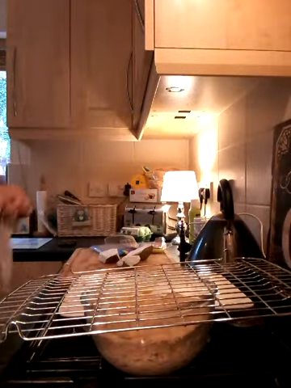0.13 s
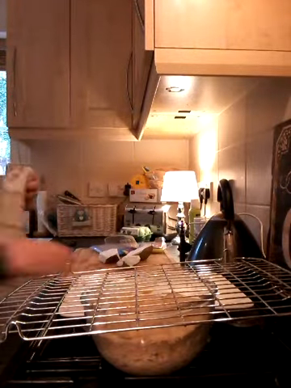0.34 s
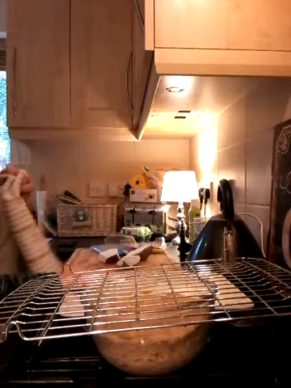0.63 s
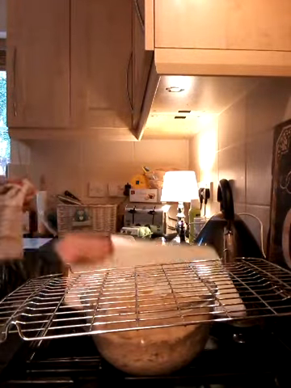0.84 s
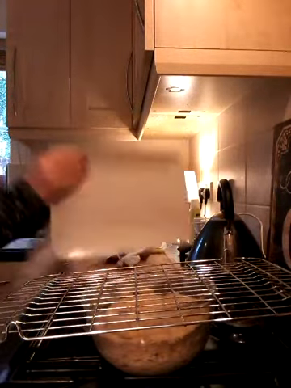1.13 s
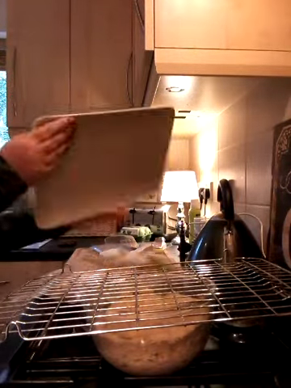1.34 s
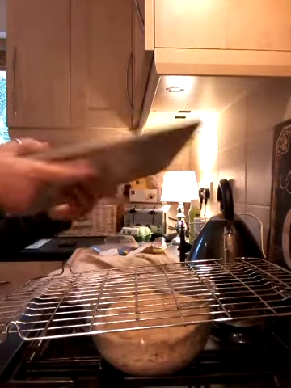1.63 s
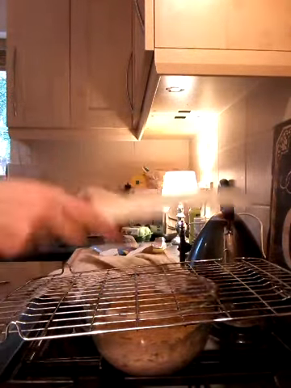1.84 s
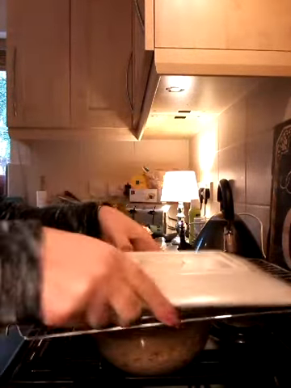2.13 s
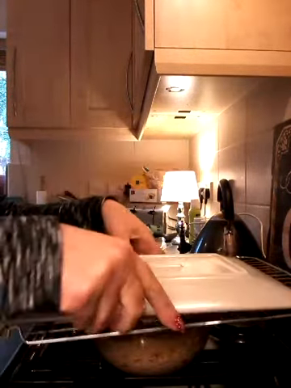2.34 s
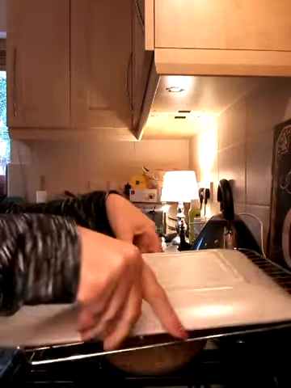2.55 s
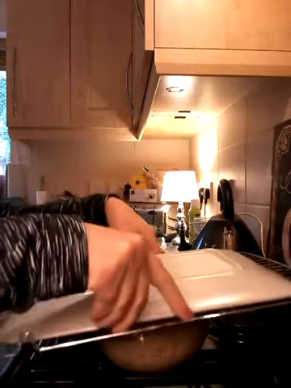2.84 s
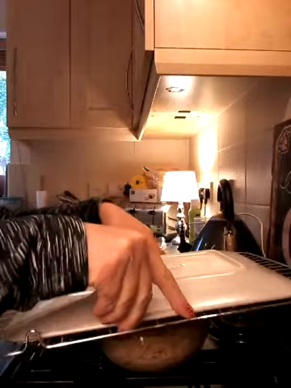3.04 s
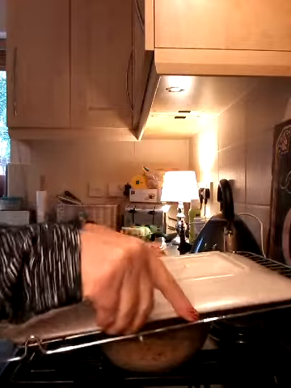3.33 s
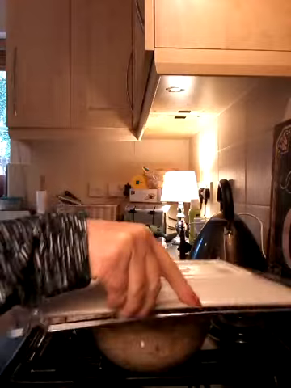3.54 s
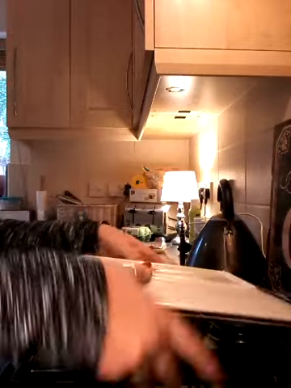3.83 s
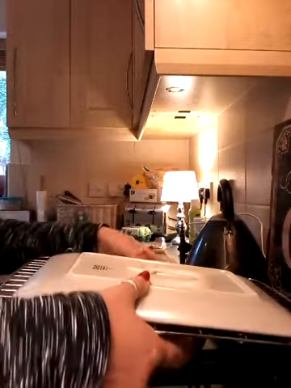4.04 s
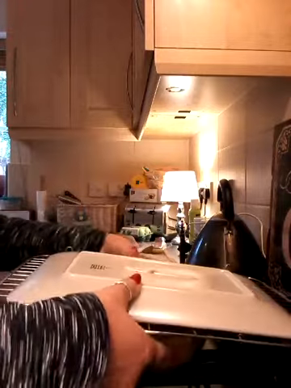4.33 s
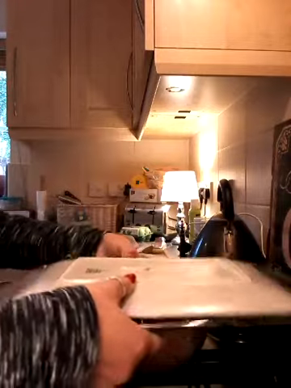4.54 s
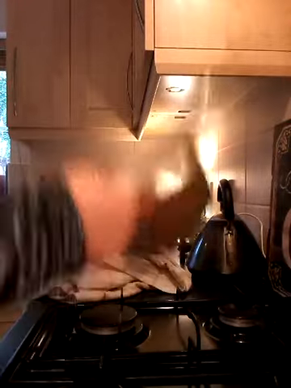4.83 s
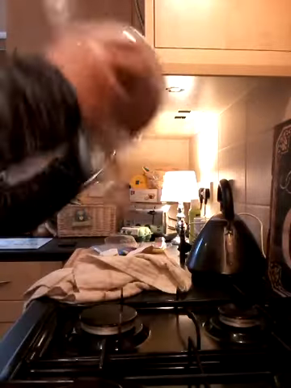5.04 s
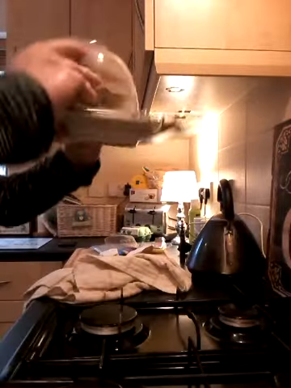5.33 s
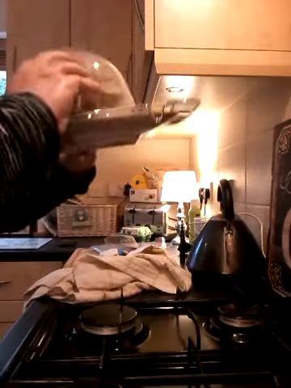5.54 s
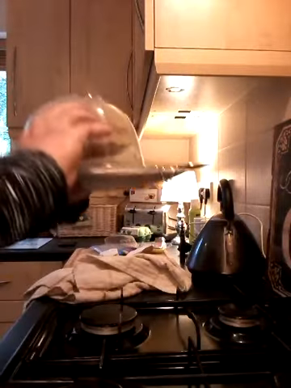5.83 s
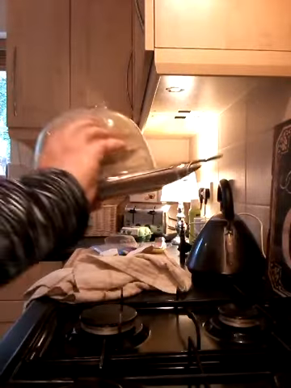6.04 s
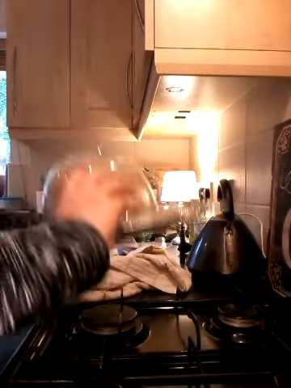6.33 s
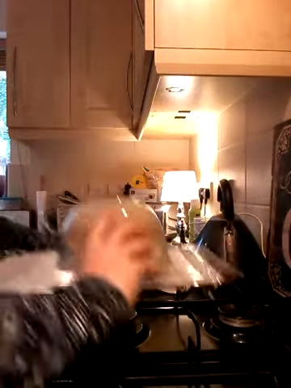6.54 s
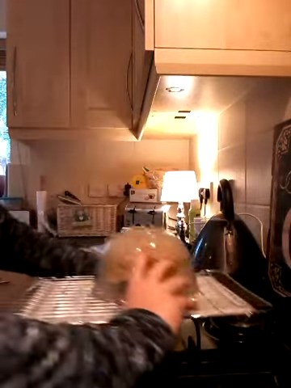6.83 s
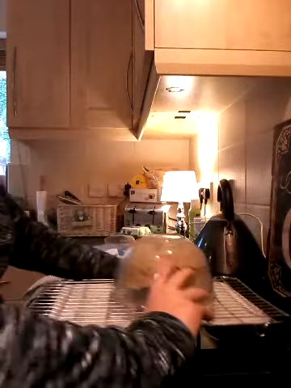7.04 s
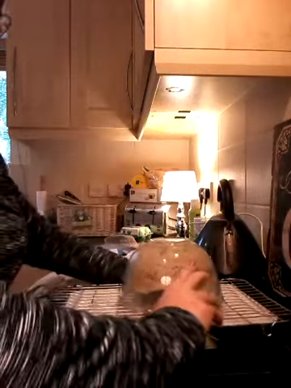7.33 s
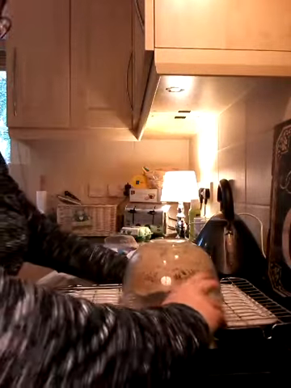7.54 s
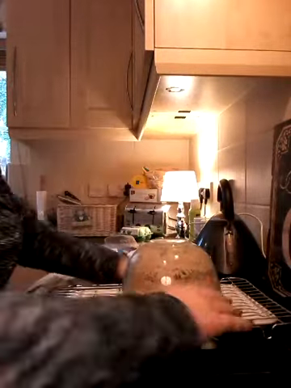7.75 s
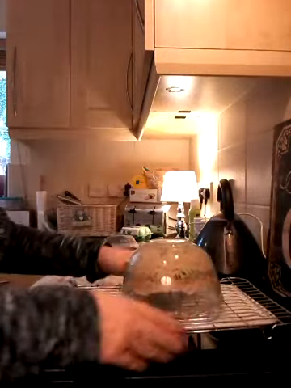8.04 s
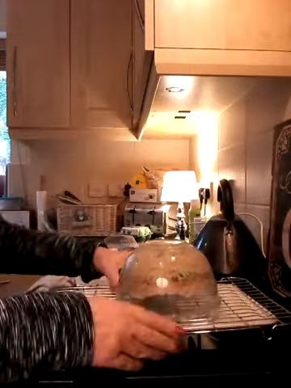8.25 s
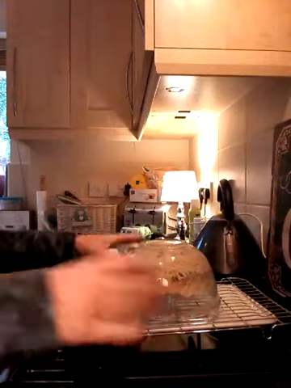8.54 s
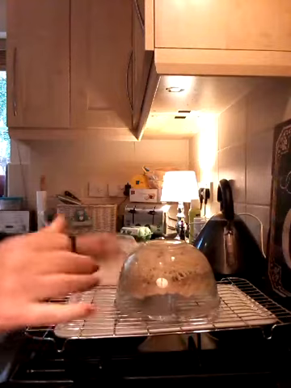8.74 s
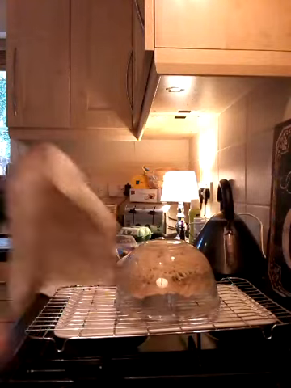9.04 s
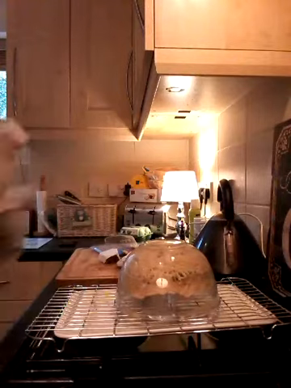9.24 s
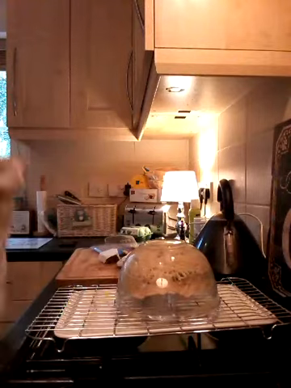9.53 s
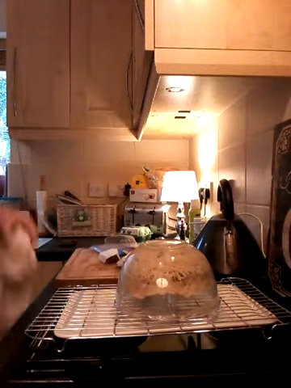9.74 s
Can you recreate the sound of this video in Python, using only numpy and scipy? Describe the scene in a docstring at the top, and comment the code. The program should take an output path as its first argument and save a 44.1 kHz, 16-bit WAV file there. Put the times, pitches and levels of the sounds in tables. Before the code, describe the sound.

Loud bright metallic scrape and clatter, rack rattles and dull bumps on a cooker top, ending with wooden knocks and small dish clinks over fridge-like hum.

```python
"""First comes a fridge-like hum with faint sliding, then metal clatters in a quiet kitchen.
A tray is pulled from under a wire rack, laid on it, turned over with a glass bowl and set down on the hob;
then something wooden and some dishes knock on the worktop. Each blow is a tick and a rattle of noise that
rings a set of modes; sliding is uneven noise that rings the wires and the board; one glassy note is a
sine that rings on until it is touched. The hum is a steady low sine, room hiss and fuzzy tones."""
import sys
import numpy as np
from scipy import signal
from scipy.fft import rfft, irfft, next_fast_len
from scipy.io import wavfile
from scipy.ndimage import uniform_filter1d

SR = 44100
rng = np.random.default_rng(int(sys.argv[2]) if len(sys.argv) > 2 else 0)


def dump_mix(stems):
    """Bounce the given channels to the path in sys.argv[1] as a 16-bit WAV at rate SR."""
    frames = np.atleast_2d(stems).T  # one column per channel
    limited = np.clip(frames, -1, 1)  # hard clip at full scale
    pcm = np.round(limited * 32767).astype(np.int16)
    wavfile.write(sys.argv[1], SR, pcm)


N = 436590  # length of the scene in samples


def pulled_tray():
    """Blows of every hardness ring the tray as it is pulled from under the rack."""
    # blows: start_s, level_db (3.5-8.5 kHz, before a fixed cut), low_db and mid_db (bands against that),
    # rattle_s (time to fall 60 dB), rise_s
    pull_blows = [(0.664, -45, 5, -1.5, .36, .016), (0.7302, -29, 12, 6, .21, 0.00037),
                  (0.7594, -22, -3, -5, .2, 0.017), (0.7914, -5.5, -6.5, -5, .13, 0.0041),
                  (0.8344, -9.5, -17, -10.5, .17, 0.011), (0.8844, -6, -27.5, -8.5, .11, 0.0047),
                  (0.9573, -2.5, -17.5, -11.5, .094, 0.00057), (0.9995, -11.5, -11.5, -6.5, .082, 0.0052),
                  (1.0394, -19.5, -29, -20, .22, .01)]
    # ringing modes: pitch_hz, width_hz, level_db (relative)
    pull_modes = [(357, 28, -3.5), (676, 220, -6), (1586, 41, -9.5), (1860, 28, -12), (2097, 31, -4),
                  (2455, 68, -4.5), (2590, 110, -9), (2810, 87, -10), (3430, 74, -10.5), (3746, 46, 1.5),
                  (4330, 30, -3.5), (4630, 49, -8), (5140, 40, -9.5), (6030, 110, -8.5), (6270, 12, -2),
                  (6456, 55, -2), (6910, 44, 4), (7240, 16, 4), (8350, 68, -3.5), (8660, 45, -1.5),
                  (9270, 39, -9.5), (10100, 130, -2.5), (11200, 39, -14), (11550, 100, -21),
                  (13300, 29, -19.5)]
    return blows(pull_blows, pull_modes, top_db=-23, top_slope=0.44, ring_db=1.55, spot_db=1.7)


def tray_knocks():
    """Knocks that all land alike ring the tray's own modes."""
    # blows: start_s, level_db (3.5-8.5 kHz, before a fixed cut), low_db and mid_db (bands against that)
    knocks = [(1.5454, 0.5, -29.5, -13.5), (1.5744, -15, -17, -4), (1.5964, -7.5, -45, -56),
              (1.8472, -19.5, -39, -18), (1.8744, -26, -18, -15), (1.8982, -27, -34, -21),
              (1.9834, -43, -5, -15), (2.1296, -45, -28, -34)]
    # ringing modes: pitch_hz, width_hz, level_db (relative)
    tray_modes = [(943, 60, -0.5), (1638, 35, -3), (2068, 47, -6), (2415, 29, -13.5), (2466, 28, -6),
                  (3360, 39, -26.5), (3850, 70, -12.5), (4160, 44, -19.5), (4657, 260, -16.5),
                  (5400, 330, -17), (5720, 120, -9), (6240, 29, -18), (7030, 93, -8.5), (6700, 9.6, -17.5),
                  (6940, 35, -16.5), (7500, 41.1, -14), (7880, 49.8, -10), (8320, 24, -14), (8040, 20, -5),
                  (9820, 49, -9.5), (10490, 14, -15.5), (11600, 330, -20.5), (14400, 26.7, -16.5),
                  (14300, 110, -38.5)]
    landed = alike(knocks, rattle_s=0.041, rise_s=0.00044)
    return blows(landed, tray_modes, top_db=-17.5, top_slope=0.25, ring_db=8.5, spot_db=5)


def rack_blows():
    """Blows of every hardness ring the modes of the wire rack."""
    # blows: start_s, level_db (3.5-8.5 kHz, before a fixed cut), low_db and mid_db (bands against that),
    # rattle_s (time to fall 60 dB), rise_s
    rack_hits = [(2.2077, -8, -20.5, -24, 0.13, 0.0015), (2.2494, -19, -6.5, -13.5, 0.099, 0.0047),
                 (2.2997, -13, -40, -16, 0.18, 0.00051), (2.3287, -24.5, -9, -12, 0.33, 0.00064),
                 (2.5205, -50.5, 10, -30, .06, 0.00058), (2.5651, -59, 15, -24, 0.048, 0.00043),
                 (2.6467, -18.5, -15, -11.5, 0.12, 0.002), (2.805, -42.5, -23, -4, 0.049, 0.0094),
                 (2.994, -39.5, -7, -11, 0.1, 0.0081), (3.158, -31.5, -32, -7, 0.078, .012),
                 (3.1792, -6, -13.5, -17, 0.13, 0.00047), (3.2098, -17, -6.5, -12, 0.36, 0.0046),
                 (3.43, -23.5, -11, -12, 0.15, 0.039), (3.6018, -45.5, 5.5, -2, 0.071, .0065),
                 (3.6207, -28, -12, -16, .044, .0006), (3.93, -40.5, -5, -4, 0.12, 0.0073),
                 (3.9699, -40, -24, -29, 0.055, 0.00061), (4.089, -59.5, 22.5, 0, 0.034, 0.005),
                 (4.25, -40, 5, -10, 0.16, 0.017), (4.3151, -30.5, -15, -9.5, 0.2, 0.0012),
                 (4.3389, -34.5, 6.5, -11, 0.054, 0.0042), (4.5114, -50.5, 21, -1, .054, .0006),
                 (4.554, -53, -10, -10, 0.045, .002), (5.0779, -48, -32, -14, 0.0075, .0002),
                 (5.2879, -35.5, -30, -22, 0.15, .0008), (5.7453, -49, -7, -2, 0.059, .0004),
                 (5.8217, -39.5, -26, -10.5, 0.15, .014), (5.8531, -35.5, -15, -10, 0.072, .009),
                 (5.9494, -18.5, -21, -16.5, 0.033, 0.00031), (6.108, -21.5, -18.5, -16.5, 0.067, 0.0009),
                 (6.2018, -26, -17, -18, 0.032, 0.00055), (6.4213, -51.5, -27, -16, 0.061, .004),
                 (7.0601, -45, -12, -9.5, 0.046, .007), (7.131, -28, 11.5, 0.5, 0.057, 0.0035),
                 (7.1515, -17, 0.5, -10, 0.069, 0.0034), (7.239, -3.5, -17.5, -9, 0.061, 0.00061),
                 (7.2781, -13.5, -2.5, -5, 0.037, 0.0056), (7.4714, -34.5, -44, -10, .073, .0012),
                 (8.0734, -49, -38, -1, 0.11, .008), (8.16, -33, -26, -17, 0.27, 0.015),
                 (8.336, -32, 4, 10, 0.019, 0.0011), (8.4218, -35, -7, -6.5, 0.12, 0.00066),
                 (8.5195, -42, -5, -2, 0.067, 0.00071)]
    # ringing modes: pitch_hz, width_hz, level_db (relative)
    rack_modes = [(334, 200, -1), (588, 7.7, 8), (970, 17, -13), (1300, 16, -3), (1620, 54, 9.5),
                  (2172, 48, -7), (2442, 420, -2.5), (3374, 33, 6), (3787, 99, 0.5), (4320, 13, -19),
                  (4166, 71, -0.5), (4820, 83, 3.5), (5070, 98, -3.5), (6240, 51, -31), (6240, 11, -19),
                  (6380, 8.3, -33), (6940, 15.7, -9), (6697, 114, 3.5), (6820, 89, 4.5), (7310, 480, 8),
                  (7130, 41, -22.5), (8186, 44, 8.5), (8000, 18, -9), (7990, 8.6, 14.5), (9600, 110, -19),
                  (8480, 42, -28), (10100, 26, -40), (9400, 26, -33), (10540, 130, -2.5), (11740, 55, 1)]
    return blows(rack_hits, rack_modes, top_db=-24.5, top_slope=-0.29, ring_db=-1.5, spot_db=3)


def worktop_knocks():
    """Something wooden knocks on the worktop and rings its modes."""
    # blows: start_s, level_db (3.5-8.5 kHz, before a fixed cut), low_db and mid_db (bands against that)
    knocks = [(9.3834, -32.5, 5.4, -1), (9.4055, -28.5, 10, 9), (9.424, -37, 11, -2),
              (9.4678, -45, 26.5, 11), (9.49, -52, 18, 25), (9.5145, -40.5, 13, 14),
              (9.6073, -29, 13.2, -7)]
    # ringing modes: pitch_hz, width_hz, level_db (relative)
    worktop_modes = [(515, 69, 4.5), (984, 156, 4), (1544, 12, -3), (1730, 44, -6.5), (2000, 110, -41),
                     (2610, 35, -4), (3100, 44, -21), (6630, 67, -2), (7350, 71, -9), (8200, 160, -8),
                     (8380, 25, -9), (10900, 46, -12)]
    landed = alike(knocks, rattle_s=0.055, rise_s=0.0021)
    return blows(landed, worktop_modes, top_db=-12.5, top_slope=0.16, ring_db=7.5, spot_db=2.7)


def dish_clinks():
    """Short, hard contacts ring the modes of the dishes."""
    # blows: start_s, level_db (3.5-8.5 kHz, before a fixed cut), low_db and mid_db (bands against that)
    clinks = [(9.5023, -27, -21, -15), (9.616, -9, -11, -20), (9.6294, -19.5, -21, 4.5),
              (9.654, -13.5, -7.5, -22), (9.6939, -8, -17.5, -3.5), (9.6974, -8.5, -14, -22),
              (9.7064, -28, -15, -13), (9.7314, -30, -17, -20)]
    # ringing modes: pitch_hz, width_hz, level_db (relative)
    dish_modes = [(259, 20, -6), (465, 64, -5), (785, 83, -5.5), (1820, 28, -11), (2180, 130, -28),
                  (2530, 28, -9), (2840, 180, -13.5), (3545, 22, -8.5), (4110, 11, -16), (5380, 34, -12),
                  (5740, 31, -45), (6300, 130, -18), (6860, 62, 2.5), (6440, 26, -23), (7660, 52, -9),
                  (7870, 62, -12), (8140, 30, -13), (9960, 13, -11.5), (10800, 54, -36), (13300, 35, -34)]
    landed = alike(clinks, rattle_s=0.008, rise_s=0.0003)
    return blows(landed, dish_modes, top_db=-51, top_slope=-1.85, ring_db=4, spot_db=1.1)


def sliding():
    """Uneven slipping noise rings the wires and the board and adds a hiss."""
    # sliding and handling, one list a passage, each row: time_s, level_db (before the mix below)
    passages = [
        [(0.08, -79), (0.2, -70.5), (0.4, -78)],
        [(0.66, -64.5), (0.78, -36), (0.91, -34), (0.99, -22.5), (1.11, -52), (1.4, -58.5), (1.73, -54.5),
         (2.0, -62), (2.2, -65.5)],
        [(2.2, -69), (2.38, -61), (2.59, -54.5), (3.15, -65.5), (3.24, -45), (3.42, -49.5), (3.58, -57.5),
         (3.84, -59), (4.06, -67), (4.44, -60.5), (4.7, -77)],
        [(5.08, -63), (5.178, -50), (5.266, -51), (5.34, -44), (5.46, -51), (5.55, -100)],
        [(5.75, -66), (5.9, -64), (6.034, -44), (6.092, -56), (6.214, -56), (6.366, -56), (6.45, -86.5)],
        [(6.95, -70.5), (7.164, -56.5), (7.304, -33.5), (7.374, -48.5), (7.522, -59), (7.62, -65.5)],
        [(8.05, -66.5), (8.132, -56), (8.26, -45), (8.342, -55.5), (8.43, -54.5), (8.572, -63), (8.65, -71)],
        [(9.2, -71.5), (9.438, -60), (9.49, -47), (9.558, -67), (9.62, -56), (9.85, -58.5)],
    ]
    # ringing of the wires: pitch_hz, width_hz, level_db (relative)
    wire_modes = [(1560, 40, -9), (2000, 23, -10.5), (2454, 31, -18.5), (2880, 29, -11.5),
                  (3270, 140, -9.5), (3620, 370, -4.5), (4300, 48, -9), (4560, 74, -6.5), (5400, 260, -6.5),
                  (6290, 48, -13), (6000, 28, -7.5), (6560, 100, -8.5), (7750, 36, 5.5), (7960, 110, -11),
                  (9450, 76, -16.5)]
    # ringing of the board: pitch_hz, width_hz, level_db (relative)
    board_modes = [(316, 81, -5.5), (718, 55, 2.5), (1250, 57, -5.5)]
    # colour of the hiss: pitch_hz, level_db (relative)
    hiss_colour = [(590, -48.5), (1000, 1.5), (1350, -15), (1850, -1.5), (2980, -8), (3300, -6.5),
                   (4900, -8), (7350, -2), (16000, -30.5)]
    # the board against the wires: one level_db for each passage (before the mix below)
    board_share_db = [-14, -3, -1.5, -9, -10.5, -2, -3.5, -2]
    slips = rng.standard_normal((2, N)) * chatter(N, per_s=130.0, bump_db=-4.3)
    wires = evened(filtered(slips[0], peaks(wire_modes)))
    hiss = evened(filtered(slips[0], lambda hz: amp(read(hiss_colour, hz))))
    board = evened(filtered(slips[1], peaks(board_modes)))
    effort = np.array([played(rows) for rows in passages])
    on_wires = effort.sum(0) * (amp(-5.0) * wires + amp(-4) * hiss)
    on_board = amp(board_share_db) @ effort * amp(-5.5) * board
    return on_wires + on_board


def ring():
    """One thin glassy mode loses little until a hand damps it; it wavers as the tray turns."""
    # each contact sets the note anew: start_s, level_db (before the waver), loss_db_per_s
    contacts = [(0.88, -25.5, 198), (0.96, -14.5, 32), (1.55, -38, 38.5)]
    pitch_hz, stop_s, smoothing_s = 7454, 2.15, 0.0052
    waver_db, waver_per_s = 0.5, 3  # up and down by this much
    t, level = np.arange(N) / SR, np.zeros(N)
    for start_s, db, loss_db in contacts:
        level = np.where(t >= start_s, amp(db - loss_db * np.abs(t - start_s)), level)
    level = uniform_filter1d(level * (t < stop_s), round(smoothing_s * SR))
    waver = amp(waver_db * np.cos(2 * np.pi * waver_per_s * (t - contacts[1][0])))
    return level * waver * np.sqrt(2) * np.sin(2 * np.pi * pitch_hz * t)


def board_hum():
    """The board hums when squeezed: near sines that swell and fade, with a weak second harmonic."""
    # hums: start_s, length_s, level_db (mid-swell, before flutter), pitch_hz (mid-swell)
    hums = [(2.27, 0.29, -52, 284.5), (3.2, 0.15, -43.5, 282.4), (3.33, 0.1, -46.5, 281),
            (3.46, 0.24, -56, 284), (3.71, .1, -45.5, 284), (3.81, 0.15, -40, 277), (4.07, 0.082, -57, 276),
            (4.48, 0.14, -47.5, 273.4), (6.93, 0.18, -69, 293), (8.47, 0.18, -58.5, 343)]
    sag_hz, roughness, second_db = 9, 0.33, -19.0  # pitch drop at both ends, flutter share, harmonic
    out = np.zeros(N)
    for start_s, length_s, db, hz in hums:
        size = round(length_s * SR)
        arch = np.sin(np.pi * np.arange(size) / (length_s * SR))
        flutter = 1 + roughness * evened(uniform_filter1d(rng.standard_normal(size), size=500))
        phase = 2 * np.pi * np.cumsum(hz - sag_hz * (1 - arch)) / SR
        wave = np.sin(phase) + amp(second_db) * np.sin(2 * phase)
        out[round(start_s * SR):][:size] += amp(db) * arch * flutter * np.sqrt(2) * wave
    return out


def shudder():
    """Low modes of the hob and worktop after heavy blows: a rumble, and one panel that booms."""
    # shudders: start_s, level_db (before rise, fade and mix), boom_hz (pitch of the booming panel)
    shudders = [(0.6, -71.5, 61.4), (0.73, -52, 60.5), (0.811, -39, 58.3), (0.97, -38, 74),
                (2.248, -51, 97), (2.64, -56.5, 70.5), (2.98, -70, 60.4), (3.19, -51.5, 61),
                (3.42, -55, 58.4), (3.68, -54, 93), (3.86, -63, 59.3), (4.3, -56, 58.4), (5.952, -56, 97.6),
                (6.18, -64, 101.8), (7.129, -41.5, 62.3), (7.24, -45, 60.3), (8.24, -51.5, 56),
                (8.35, -64.5, 56), (8.52, -67, 57.2), (9.59, -58, 66)]
    # colour of the rumble: pitch_hz, level_db (relative)
    rumble_colour = [(15, -40.5), (25, -26.5), (40, -11), (59, -3.5), (77, 0), (107, -5), (145, -6.5),
                     (167, -12), (220, -8.5), (290, -43.5), (480, -120)]
    rise_s, rumble_t60_s, boom_t60_s = 0.04, 0.9, 1  # t60: time to fall 60 dB
    t, power, boom = np.arange(N) / SR, np.zeros(N), np.zeros(N)
    for start_s, db, boom_hz in shudders:
        since = np.maximum(t - start_s, 0)
        start = (1 - np.exp(-since / rise_s)) * amp(db)
        power += (start * amp(-60 * since / rumble_t60_s)) ** 2
        boom += start * amp(2 - 60 * since / boom_t60_s) * np.sin(2 * np.pi * boom_hz * since)
    rumble = evened(filtered(rng.standard_normal(N), lambda hz: amp(read(rumble_colour, hz))))
    return amp(-1.5) * np.sqrt(power) * rumble + boom


def kitchen(x):
    """Echoes of the room: sparse taps of random sign, each band dying at its own speed."""
    # how long echoes last: pitch_hz, t60_s (time to fall 60 dB)
    decay = [(150, 0.56), (1000, 0.25), (4000, 0.26), (12000, 0.083)]
    taps = np.zeros(SR // 2)
    at = np.arange(120, SR // 2 - 20, 20)
    taps[at + rng.integers(0, 20, len(at))] = rng.choice([-1., 1.], len(at))
    hz, t, z = signal.stft(taps, SR, nperseg=256)
    fade = amp(-60 * t / read(decay, hz)[:, None])
    tail = signal.istft(z * fade, SR, nperseg=256)[1]
    return signal.oaconvolve(x, tail / np.linalg.norm(tail))[:N]


def air():
    """The fridge-like bed: room hiss with faint patches, a low sine and fuzzy motor tones."""
    # colour of the hiss: pitch_hz, level_db (relative)
    hiss_colour = [(15, -51), (25, -21), (70, -17), (102, 0), (157, -25), (416, -14.5), (659, -22.5),
                   (754, -24.5), (988, -26), (1070, -18.5), (1440, -24), (1610, -23.5), (2480, -28),
                   (7510, -29), (16000, -33.5)]
    # fuzzy motor tones: pitch_hz, width_hz, level_db (relative)
    motor_tones = [(710, 93, -5), (1120, 6, 6), (1626, 19, -5), (4520, 71, -7.5), (5390, 28, -13),
                   (7070, 150, -9.5), (7800, 34, -6.5)]
    hiss_db, motor_db, patches_db = -67, -71.5, 1.8
    mains_hz, mains_db = 100.6, -67
    frames, hz = N // 256 + 5, np.fft.rfftfreq(1024, 1 / SR)
    a, b, patches = rng.standard_normal((frames, 513, 3)).T
    patches = uniform_filter1d(patches, 14, 0)  # smooth over about 600 Hz
    patches = evened(uniform_filter1d(patches, 30, 1))  # and over about 0.17 s
    z = (a + 1j * b) * amp(read(hiss_colour, hz)[:, None] + patches_db * patches)
    hiss = evened(signal.istft(z, nperseg=1024, noverlap=768)[1][:N])
    mains = amp(mains_db) * np.sin(2 * np.pi * mains_hz * np.arange(N) / SR)
    motor = evened(filtered(rng.standard_normal(N), peaks(motor_tones)))
    return mains + amp(hiss_db) * hiss + amp(motor_db) * motor


def blows(table, modes, top_db, top_slope, ring_db, spot_db):
    """A tick and a dying rattle excite the modes, by other amounts at each spot, and the dense body.

    top_db: band above 8.5 kHz for a 0 dB blow; top_slope: its change per dB of blow;
    ring_db: modes over body before the bands are balanced; spot_db: spread of the modes from spot to spot."""
    # edges of the low, mid, main and top bands: pitch_hz
    edges_hz = [150, 1200, 3500, 8500, 14000]
    # where the band corrections apply, the main band at two places: pitch_hz
    tilt_hz = [420, 2050, 3900, 6300, 10900]
    size, lead = 32768, 88  # samples; the lead leaves 2 ms to fade in
    tick_s = 0.003
    out, t, hz = np.zeros(N + size), np.arange(size) / SR, np.fft.rfftfreq(size, 1 / SR)
    f, width, mode_db = np.transpose(modes)
    signs = (-1) ** np.arange(len(f))
    ringing = poles(hz, f, np.maximum(width, 12))  # no mode is narrower than 12 Hz
    body = thicket(hz, count=160)
    band = np.digitize(hz, edges_hz[1:-1])
    is_main = np.digitize(np.fft.rfftfreq(4096, 1 / SR), edges_hz) == 3  # 3.5-8.5 kHz
    for start_s, db, low_db, mid_db, rattle_s, rise_s in table:
        contact = chatter(size, per_s=110.0, bump_db=2.)
        contact += 0.76 * np.exp(-t / 0.01)  # the first contact always lands
        drive = rng.standard_normal(size) * contact * amp(-60 * t / rattle_s)
        drive *= 1 - np.exp(-t / rise_s)
        drive[0] = tick_s / rise_s  # the harder the first contact, the sharper its tick
        spot = amp(mode_db + spot_db * rng.standard_normal(len(f)))
        rings = (spot * signs) @ ringing
        response = body / np.linalg.norm(body) + amp(ring_db) * rings / np.linalg.norm(rings)
        # balance the four bands
        strength_db = 10 * np.log10(np.bincount(band, abs(response) ** 2))
        tilt_db = [low_db, mid_db, 0, top_db + top_slope * db] - strength_db
        tilt_db = np.insert(tilt_db, 2, tilt_db[2])
        response *= amp(read(np.transpose([tilt_hz, tilt_db]), hz))
        sound = np.roll(irfft(rfft(drive) * response), lead)[:size // 2]
        sound[:lead] *= np.hanning(2 * lead)[:lead]
        # level by the loudest 200 samples of the main band
        main = irfft(rfft(sound[:4096]) * is_main)
        loudest = np.sqrt(uniform_filter1d(main ** 2, size=200).max())
        out[round(start_s * SR) - lead:][:size // 2] += sound * amp(db) / (3.51 * loudest)
    return out[:N]


def alike(table, rattle_s, rise_s):
    """Gives every blow of a table the same rattle and rise."""
    return [(*row, rattle_s, rise_s) for row in table]


def thicket(hz, count):
    """Many thin modes of single wires and panels, scattered by chance over the smooth body."""
    # smooth body of dense modes: pitch_hz, level_db (relative)
    body_colour = [(59, -32), (100, -14.5), (200, -11), (320, -6), (470, -5), (700, 0.5), (1100, -13),
                   (1580, -13.5), (3540, -19), (3860, -18), (5900, -17.5), (6560, -5.5), (16000, -46.5)]
    place, size = rng.random(count), rng.standard_normal(count)
    thin = size @ poles(hz, 250 + 14000 * place, np.full(count, 41.0))  # each 41 Hz wide
    return amp(read(body_colour, hz)) * (1 + thin / np.sqrt(np.mean(abs(thin) ** 2)))


def chatter(size, per_s, bump_db):
    """Uneven contacts: a floor plus sparse bumps of random size, each falling to 1/e in 9.6 ms."""
    bumps = amp(bump_db * np.minimum(rng.exponential(1, size), 3)) * (rng.random(size) < per_s / SR)
    return .5 + signal.lfilter([1], [1, -np.exp(-1 / (0.0096 * SR))], bumps)


def poles(hz, centre_hz, width_hz):
    """Causal responses of resonances, gain 1 at each centre."""
    half = np.asarray(width_hz)[:, None] / 2
    return half / (half + 1j * (hz - np.asarray(centre_hz)[:, None]))


def peaks(table):
    """Sum of resonances, with alternating signs, as a function of Hz."""
    f, width, db = np.transpose(table)
    return lambda hz: (amp(db) * (-1) ** np.arange(len(f))) @ poles(hz, f, width)


def filtered(x, gain):
    """Applies gain(Hz) to x."""
    size = next_fast_len(len(x))
    return irfft(rfft(x, size) * gain(np.fft.rfftfreq(size, 1 / SR)), size)[:len(x)]


def read(points, hz):
    """Reads a curve of values on a log-frequency axis."""
    f, value = np.transpose(points)
    return np.interp(np.log(hz + 1), np.log(f + 1), value)


def played(rows):
    """Gain over the whole scene from a level curve, silent outside it, with soft ends."""
    out, (s, db) = np.zeros(N), np.transpose(rows)
    at = np.arange(round(s[0] * SR), min(round(s[-1] * SR), N))
    soft_ends = signal.windows.tukey(len(at), min(1, 1300 / len(at)))
    out[at] = amp(np.interp(at / SR, s, db)) * soft_ends
    return out


def amp(db):
    """dB to gain."""
    return 10 ** (np.asarray(db) / 20)


def evened(x):
    """Scales to rms 1."""
    return x / np.sqrt(np.mean(x ** 2) + 1e-20)


def scene():
    """Blows and sliding with their echoes in the kitchen, then the tones, the shudder and the air."""
    metal = pulled_tray() + rack_blows() + tray_knocks()
    near = metal + worktop_knocks() + dish_clinks() + sliding()
    tones = ring() + board_hum()
    return (near + amp(-3.5) * kitchen(near) + tones + shudder() + air())[None]


def record(dry):
    """The microphone drops the deepest bass and rounds off the loudest peaks; then the band limit."""
    knee, headroom, edge_hz = 0.65, 0.25, 15900  # rounding starts at the knee
    thin = signal.sosfilt(signal.butter(2, 33, "high", fs=SR, output="sos"), dry)
    over = np.maximum(np.abs(thin) - knee, 0)
    soft = thin - np.sign(thin) * (over - headroom * np.tanh(over / headroom))
    band_limit = signal.firwin(511, edge_hz, window=("kaiser", 9), fs=SR)
    return signal.oaconvolve(soft, band_limit[None], "same")


dry = scene()
out = record(dry)
dump_mix(out)
```